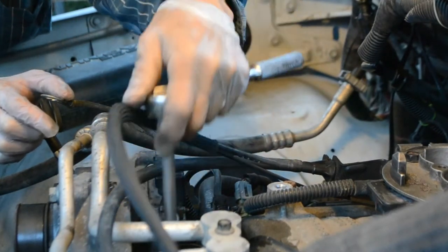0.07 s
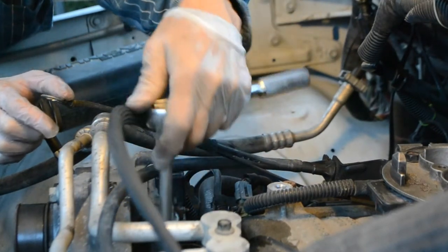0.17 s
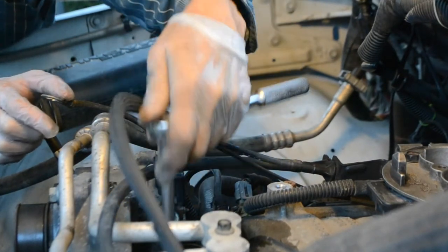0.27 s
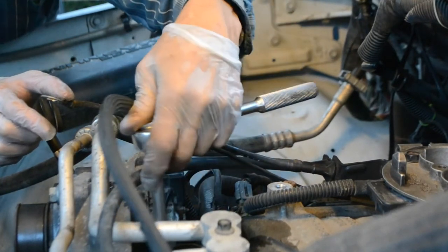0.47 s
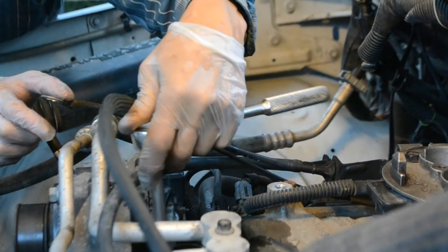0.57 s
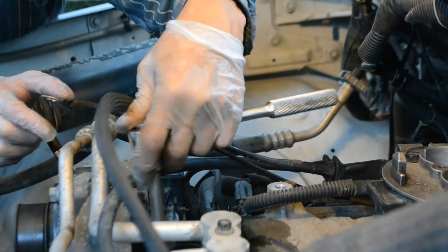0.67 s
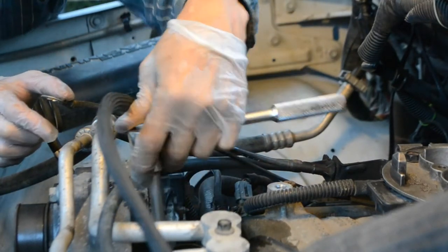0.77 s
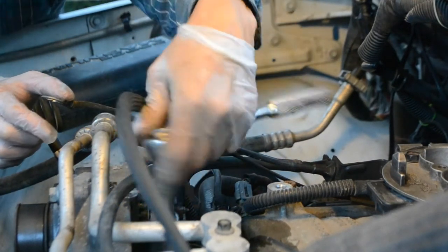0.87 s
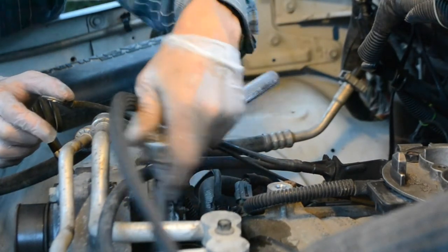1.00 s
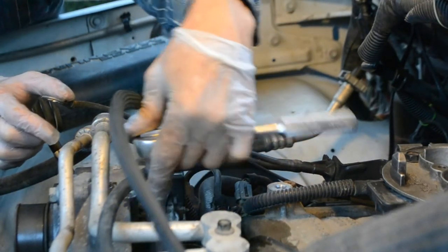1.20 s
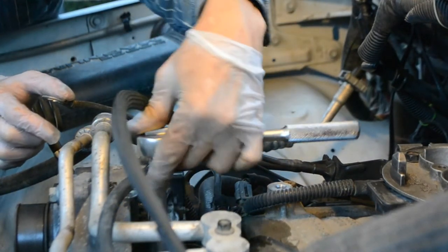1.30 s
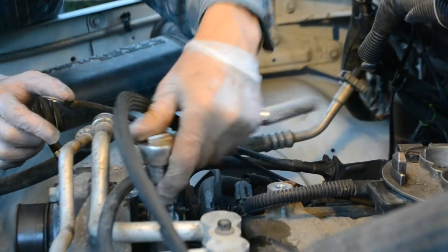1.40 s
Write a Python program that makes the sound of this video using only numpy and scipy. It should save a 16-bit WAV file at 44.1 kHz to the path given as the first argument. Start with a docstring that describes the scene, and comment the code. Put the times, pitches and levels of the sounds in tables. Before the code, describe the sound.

A steel ratchet tool clinks against an engine, then gloves scuff and the ratchet clicks.

```python
"""A long steel extension sings faintly as it is dragged, then clinks hard against an engine, close by.
Each blow rings the bar, clashes its loose joints and knocks the engine. As the tool is worked onto a
bolt, gloves scuff and swish, hand and tool bump the hoses, and the ratchet head snaps out two bright
clicks among fainter ticks. The engine bay answers the hard hits briefly; the quiet garage adds a faint
tail and a steady bed of noise."""
import sys
import numpy as np
from scipy import signal
from scipy.fft import rfft, irfft, next_fast_len
from scipy.io import wavfile

SR = 44100
rng = np.random.default_rng(int(sys.argv[2]) if len(sys.argv) > 2 else 0)


def pcm_store(signal):
    """Save signal as 16-bit PCM."""
    levels = np.round(np.clip(np.atleast_2d(signal), -1, 1) * 32767)
    wavfile.write(sys.argv[1], SR, levels.astype(np.int16).T)


N = 63945
T = np.arange(N) / SR

# room tone of the garage (frequency [Hz], level [dB])
GARAGE_SPECTRUM = [(15, -68), (25, -38), (60, -4), (135, -0.5), (189, 3), (263, -5), (407, -7),
                   (525, -10.5), (613, -8.5), (812, -13), (996, -3.5), (1620, -7), (3580, -8),
                   (9470, -20.5), (11300, -29.5), (14700, -67), (22000, -120)]
# tail of the garage (frequency [Hz], t60 [s])
GARAGE_DECAY = [(200, 0.66), (1500, 0.77), (4000, 0.34), (9000, 0.43)]
# short echo of the engine bay (frequency [Hz], t60 [s])
BAY_DECAY = [(300, 0.18), (2000, 0.2), (9000, 0.12)]

# faint rustle of sleeves and gloves (time [s], level [dB])
RUSTLE_LEVELS = [(0, -50), (.03, -55), (.11, -65), (.19, -51.5), (.4, -66), (.48, -55), (.6, -64),
                 (.84, -61.5), (1.0, -53.5), (1.24, -61), (1.3, -57.5), (1.45, -51)]
# glove and tool scuffing along hoses (time [s], level [dB], rise [s], t60 [s], tilt [dB/octave])
HOSE_SCUFFS = [(0.864, -39, 0.0041, 0.088, 0), (.872, -34, 0.0054, 0.1, 1.5), (.894, -29, 0.0029, 0.17, 1),
               (.910, -31.5, 0.0051, .11, 0.5), (1.019, -37.5, 0.015, 0.1, 3.5),
               (1.073, -43.5, 0.0047, 0.11, 9), (1.352, -48, 0.03, 0.11, -4),
               (1.3928, -37, 0.0023, 0.14, 3.5)]
# rough colour of scuffs and rustle (frequency [Hz], level [dB])
SCUFF_SPECTRUM = [(80, -28), (200, -21), (300, 0.5), (550, 0.5), (850, 4), (1500, 0.5), (2200, -2),
                  (3200, -6), (4500, -10), (5600, -18.5), (9500, -23), (12000, -50)]
# glove sliding over smooth steel (time [s], level [dB], rise [s], t60 [s])
STEEL_SWISHES = [(.970, -39.5, .016, 0.081), (1.344, -44.5, 0.041, .15), (1.421, -35.5, 0.0062, 0.091)]
# thin colour of a swish (frequency [Hz], level [dB])
SWISH_SPECTRUM = [(500, -34), (2000, -13), (4500, 2), (7200, 2), (9500, -1.5), (11000, -20), (13000, -42)]

# tool tapping hoses and plastic (time [s], level [dB])
TOOL_TAPS = [(0.912, -25.5), (1.056, -35.5), (1.0597, -37), (1.2603, -41.5), (1.3840, -32.5), (1.3932, -35)]
# dry colour of a tap (frequency [Hz], level [dB])
TAP_SPECTRUM = [(150, -26), (400, -9), (750, -3.5), (1300, -6), (2100, -3), (2800, 2.5), (3500, -8),
                (4400, 0.5), (6000, -13), (9500, -20.5), (12000, -44)]
# hand bumping hoses (time [s], level [dB], centre [Hz], rise [s], t60 [s])
HAND_BUMPS = [(.283, -53, 288, .004, 0.17), (.445, -57.5, 109, 0.013, 0.21), (1.085, -47, 338, 0.0035, .12),
              (1.103, -49, 297, 0.0047, 0.06), (1.261, -51, 358, 0.0022, 0.17),
              (1.285, -63.5, 105, 0.014, .25), (1.30, -56, 360, 0.037, .25)]

# ratchet head clicking (time [s], ring level [dB], snap level [dB], tilt [dB/octave])
RATCHET_CLICKS = [(1.1148, -42, -39, 0.5), (1.1281, -31, -20.5, 2), (1.1670, -57, -41, -2.5),
                  (1.1737, -20.5, -21.5, 1.5), (1.4254, -49, -35.5, -5.5)]
# high ring of the ratchet head (frequency [Hz], level [dB], t60 [s])
HEAD_MODES = [(3630, -18.5, 0.1), (6460, -2.5, 0.044), (6680, -9, 0.072), (7290, -21, .09),
              (8190, -9, 0.057), (8540, -3, 0.068), (8830, -12, .1), (9800, -18, 0.064)]
# bright snap of its small parts (frequency [Hz], level [dB])
SNAP_SPECTRUM = [(300, -30.5), (1400, -22), (2600, -16.5), (3700, -11), (5700, -10.5), (6500, -3.5),
                 (7600, -8), (8400, 3.5), (9200, -11.5), (10400, -8), (12000, -33), (14000, -34)]

# extension singing as it is dragged (time [s], level [dB], rise [s], t60 [s])
BAR_DRAGS = [(0.035, -44.5, 0.0095, 0.2)]
# extension striking the engine
# (time [s], ring level [dB], clash level [dB], knock level [dB], rise [s], tilt [dB/octave])
BAR_BLOWS = [(.1358, -47, -51, -32.5, 0.00083, -3.5), (.2246, -17.5, -17.5, -29.5, 0.0008, -1),
             (.2755, -20, -19.5, -22, 0.0022, 1), (.2772, -27, -16.5, -25, 0.00089, 0),
             (.3490, -26.5, -32.5, -35, .0008, -0.5)]
# ring of the extension (frequency [Hz], level [dB], t60 [s])
BAR_MODES = [(716.4, -7, .17), (753, -13, .14), (1738, -20.5, .13), (1920, -17, 0.11), (3160, -17, 0.071),
             (3350, -28, .1), (3740, -11.5, 0.13), (3857, 1.5, 0.069), (4020, -9, 0.075),
             (4300, -11.5, .12), (4570, -12.5, 0.059), (5360, -20, .08), (6570, -22, 0.065),
             (8500, -23, 0.16)]
# dense ring of socket and joints (frequency [Hz], level [dB])
CLASH_SPECTRUM = [(300, -33), (1000, -26), (2500, -14), (3100, 2.5), (3850, -0.5), (4400, 0), (4900, -7.5),
                  (6500, -4), (7700, -14), (8600, -12.5), (10200, -18.5), (12500, -45)]
# knock of the struck engine parts (frequency [Hz], level [dB])
KNOCK_SPECTRUM = [(100, -32), (300, -19), (520, -21.5), (660, -0.5), (1050, -1.5), (1700, 4), (2400, -0.5),
                  (3200, -6), (5000, -30), (11000, -46)]


def amp(db):
    """Decibels to gain."""
    return 10 ** (np.asarray(db) / 20)


def unit(x):
    """Scale to rms 1."""
    return x / np.sqrt(np.mean(x ** 2) + 1e-20)


def along(points, hz):
    """Read (frequency, value) points on a log frequency axis."""
    freqs, values = np.transpose(points)
    return np.interp(np.log(hz + 1), np.log(freqs + 1), values)


def filtered(x, gain):
    """Equalise x with a gain that depends on frequency."""
    size = next_fast_len(N + 8192)
    return irfft(rfft(x, size) * gain(np.fft.rfftfreq(size, 1 / SR)), size)[:N]


def coloured(x, spectrum, tilt=0):
    """Shape x to a spectrum, tilted in dB per octave above 250 Hz, at rms 1."""
    gain = lambda hz: amp(along(spectrum, hz) + tilt * np.log2(np.maximum(hz, 250) / 1000))
    return unit(filtered(x, gain))


def noise(spectrum, tilt=0):
    """Coloured noise of rms 1."""
    return coloured(rng.standard_normal(N), spectrum, tilt)


def envelope(start, rise, t60):
    """A straight attack, then an exponential decay."""
    age = T - start
    return np.clip(age / rise, 0, 1) * np.exp(-np.log(1000) * np.maximum(age - rise, 0) / t60)


def ring(modes, start, rise, tilt, scatter_db=1.0):
    """Struck steel: decaying sines whose levels and phases vary from blow to blow."""
    chance = rng.standard_normal((len(modes), 2))
    centre_hz = np.mean([mode[0] for mode in modes])
    out = np.zeros(N)
    for (hz, db, t60), (scatter, phase) in zip(modes, chance):
        gain = amp(db + scatter_db * scatter + tilt * np.log2(hz / centre_hz))
        out += gain * envelope(start, rise, t60) * np.sin(2 * np.pi * hz * (T - start) + np.pi * phase)
    return out


def friction(spectrum, tilt=0, slips_per_s=1500):
    """Tiny random slips and smooth rubbing noise, mixed at equal power."""
    slips = (rng.random(N) < slips_per_s / SR) * rng.standard_normal(N)
    return coloured(unit(slips) + rng.standard_normal(N), spectrum, tilt)


def echo(x, decay):
    """A diffuse tail in which each frequency dies at its own speed."""
    hz, t, bands = signal.stft(rng.standard_normal(SR * 3 // 4), SR, nperseg=256)
    fade = np.exp(-np.log(1000) * t / along(decay, hz)[:, None])
    _, tail = signal.istft(bands * fade, SR, nperseg=256)
    tail[:SR // 400] = 0  # 2.5 ms pre-delay
    return signal.fftconvolve(x, tail / np.linalg.norm(tail))[:N]


def in_garage(x, tail_db=-21.5, tone_db=-60.5):
    """The garage gives a sound a faint tail and lays steady room tone under it."""
    return x + amp(tail_db) * echo(x, GARAGE_DECAY) + amp(tone_db) * noise(GARAGE_SPECTRUM)


def in_bay(x, echo_db=-10.5):
    """The engine bay answers a sound with tight reflections."""
    return x + amp(echo_db) * echo(x, BAY_DECAY)


def gloves():
    """Friction: rough scuffs on hoses, thin swishes on steel and a faint rustle between them."""
    out = amp(np.interp(T, *np.transpose(RUSTLE_LEVELS))) * friction(SCUFF_SPECTRUM, tilt=0.18)
    for start, db, rise, t60, tilt in HOSE_SCUFFS:
        out += amp(db) * friction(SCUFF_SPECTRUM, tilt) * envelope(start, rise, t60)
    for start, db, rise, t60 in STEEL_SWISHES:
        out += amp(db) * friction(SWISH_SPECTRUM) * envelope(start, rise, t60)
    return out


def hoses(bump_width_oct=0.3):
    """Rubber and plastic give dry taps under the tool and soft, low bumps under the hand."""
    taps = sum(amp(db) * noise(TAP_SPECTRUM) * envelope(start, rise=0.00046, t60=0.046)
               for start, db in TOOL_TAPS)
    bumps = np.zeros(N)
    for start, db, centre_hz, rise, t60 in HAND_BUMPS:
        band = lambda hz: np.exp(-0.5 * (np.log2((hz + 1) / centre_hz) / bump_width_oct) ** 2)
        hollow = unit(filtered(rng.standard_normal(N), band))
        bumps += amp(db) * hollow * envelope(start, rise, t60)
    return in_bay(taps) + bumps


def ratchet(rise=0.0003):
    """Small steel parts snap together and the head rings high."""
    out = np.zeros(N)
    for start, ring_db, snap_db, tilt in RATCHET_CLICKS:
        snap = amp(snap_db) * noise(SNAP_SPECTRUM, tilt) * envelope(start, rise, t60=0.046)
        out += amp(ring_db) * ring(HEAD_MODES, start, rise, tilt) + in_bay(snap)
    return out


def extension():
    """Each blow rings the bar, clashes its joints and knocks the engine; a drag sounds its lowest mode."""
    out = np.zeros(N)
    for start, ring_db, clash_db, knock_db, rise, tilt in BAR_BLOWS:
        clash = amp(clash_db) * noise(CLASH_SPECTRUM, tilt) * envelope(start, rise, t60=0.057)
        knock = amp(knock_db) * noise(KNOCK_SPECTRUM, tilt) * envelope(start, rise, t60=0.1)
        out += amp(ring_db) * ring(BAR_MODES, start, rise, tilt) + in_bay(clash + knock)
    lowest_hz = BAR_MODES[0][0]
    for start, db, rise, t60 in BAR_DRAGS:
        out += amp(db) * envelope(start, rise, t60) * np.sin(2 * np.pi * lowest_hz * T)
    return out


def scene():
    """Steel hits up front, handling noise beneath, all in the garage, in mono."""
    work = extension() + ratchet() + gloves() + hoses()
    return in_garage(work)[None]


def record(dry, cutoff_hz=11600):
    """A steep low-pass trims the top of the treble."""
    return signal.sosfilt(signal.butter(14, cutoff_hz, fs=SR, output="sos"), dry)


dry = scene()
out = record(dry)
pcm_store(out)
```